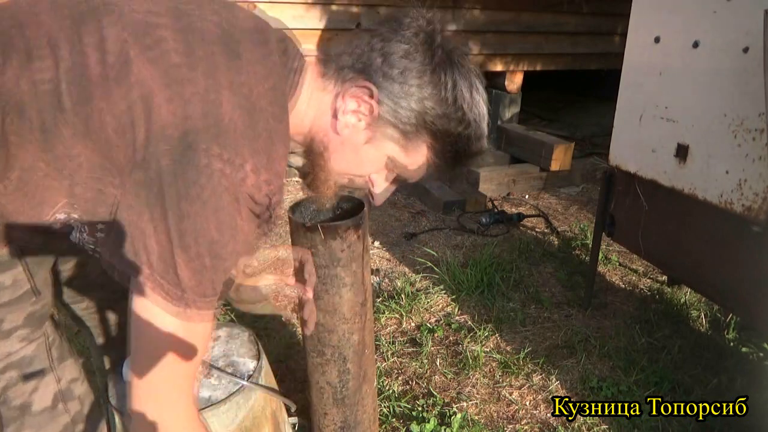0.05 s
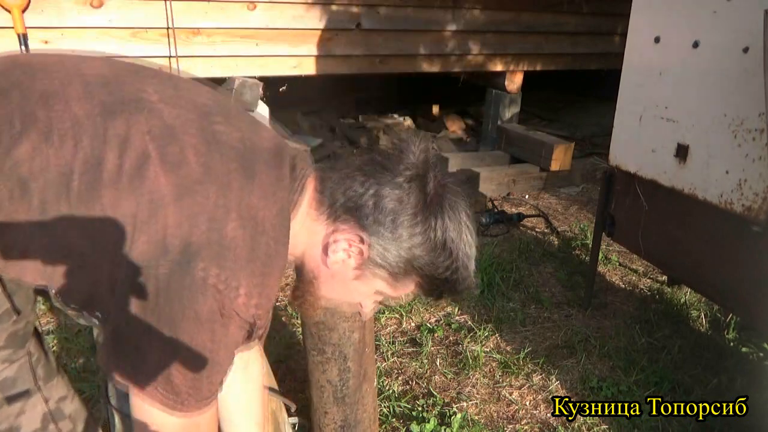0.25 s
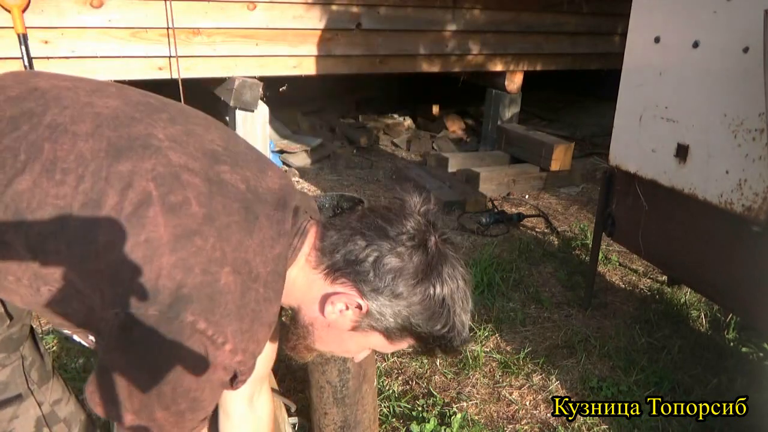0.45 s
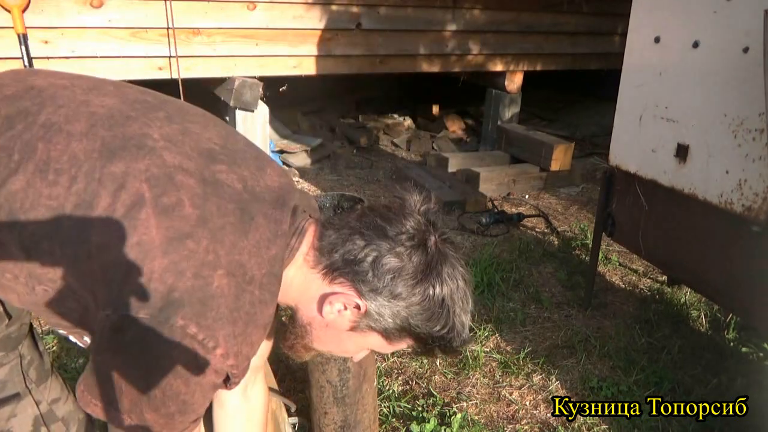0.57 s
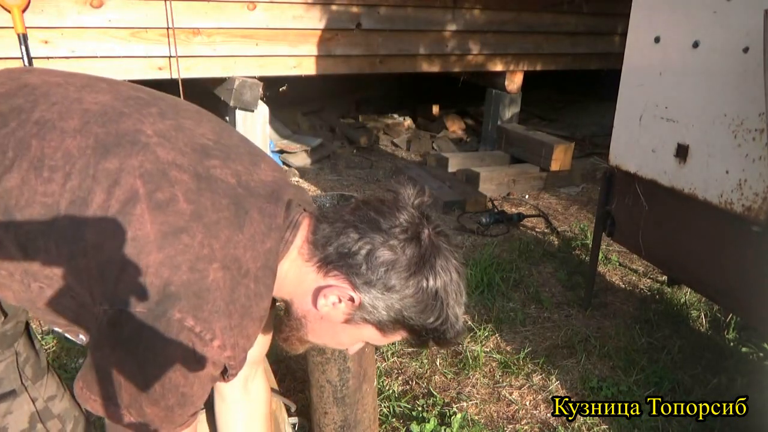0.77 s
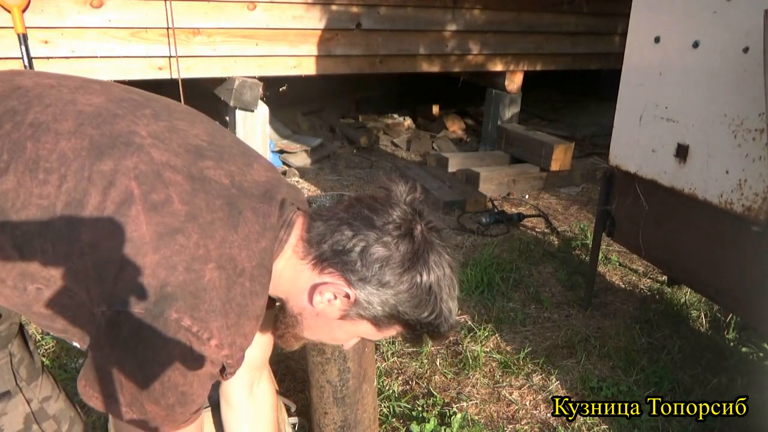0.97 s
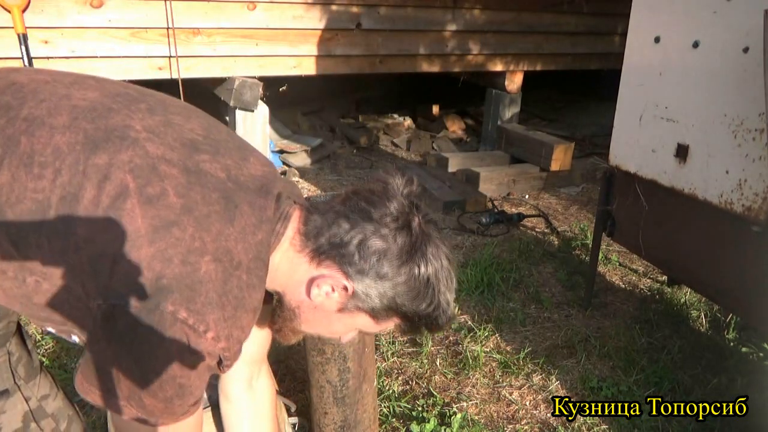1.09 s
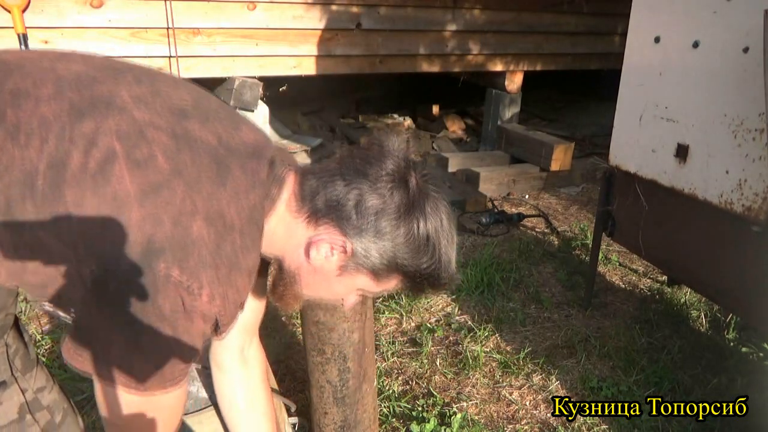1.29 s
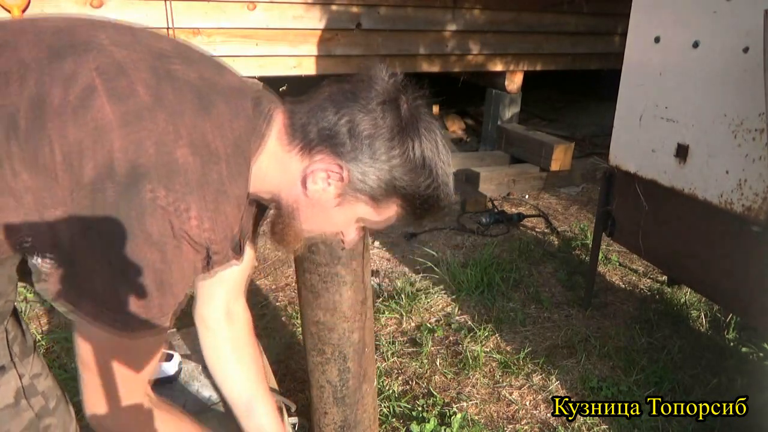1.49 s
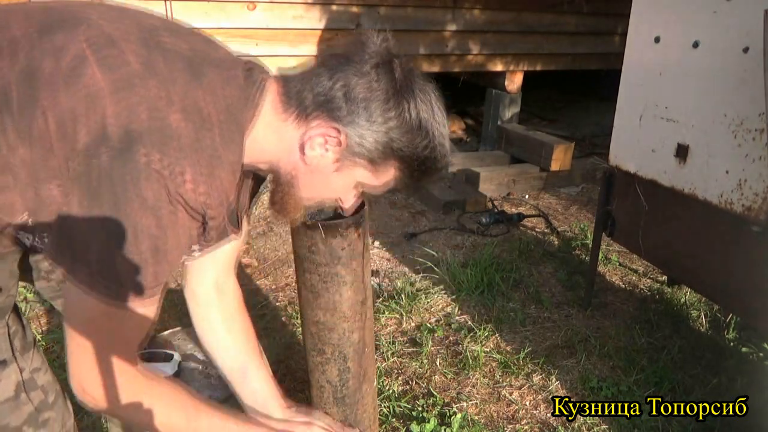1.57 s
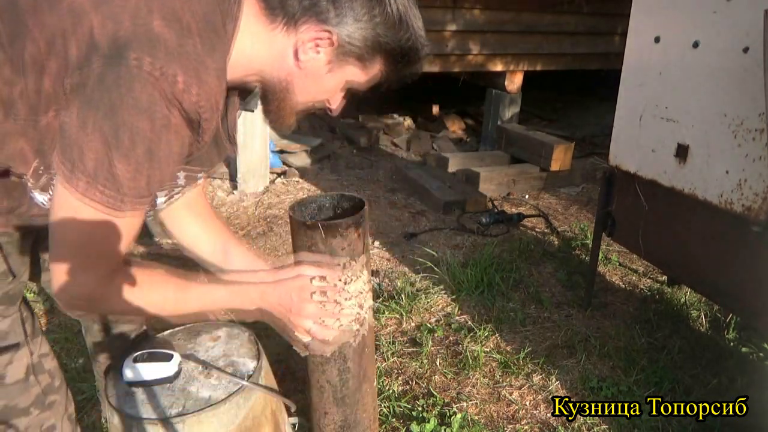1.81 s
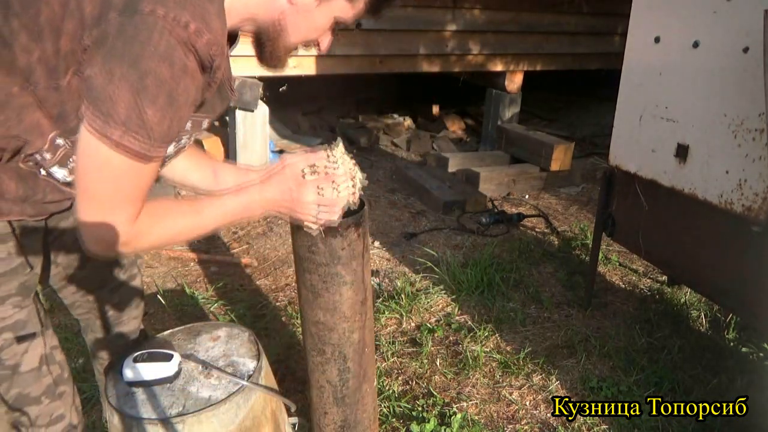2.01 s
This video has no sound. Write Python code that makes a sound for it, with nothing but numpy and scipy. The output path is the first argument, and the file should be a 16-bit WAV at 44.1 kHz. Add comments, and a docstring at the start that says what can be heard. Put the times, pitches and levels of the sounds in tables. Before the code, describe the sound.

Dry wood chips are scooped by hand from a bin in an open yard: crackling, rustling surges with dull hollow knocks, fading to a few light ticks over faint outdoor hush, heard fairly close.

```python
"""An outdoor yard with a bin of dry wood chips: two hands dig in and scoop up a handful.
Surges of small ringing grains rustle, clatter and crackle; lumps in the bin knock as decaying sines.
Stray chips tick as band-passed rattles and go on ticking once the digging has faded.
A few dull echoes and a quiet hush of shaped noise lie behind."""
import sys
import numpy as np
from scipy import signal
from scipy.fft import rfft, irfft, next_fast_len
from scipy.io import wavfile

SR = 44100
rng = np.random.default_rng(int(sys.argv[2]) if len(sys.argv) > 2 else 0)


def undo_db(level):
    """Turn decibels back into plain size, where 20 dB means ten times bigger."""
    steps = np.asarray(level, float) / 20
    return 10 ** steps


def dump(signal):
    """Clip the signal to [-1, 1] and save it as 16-bit WAV at the path in sys.argv[1]."""
    limited = np.clip(np.atleast_2d(signal).T, -1, 1)
    pcm = np.round(limited * 32767).astype(np.int16)
    wavfile.write(sys.argv[1], SR, pcm)


N = 90404

# Yard spectrum. Each row: frequency in Hz, relative density in dB.
YARD_SPECTRUM = [(18, -51), (30, -40), (115, -17.5), (760, -12), (937, -2), (1040, -20), (1130, -6.5),
                 (1320, -13), (2120, -13), (8980, -17.5), (16000, -29)]
# Reflections off ground and walls. Each row: delay in seconds, level in dB.
ECHOES = [(.0061, -18.5), (0.0123, -13.5), (.019, -23.5), (.031, -36.5)]
# Stray chips ticking. Each row: start in seconds, treble, middle and body level in dB,
# rattle length in seconds.
TICKS = [(0.1707, -36, -50, -67, 0.0017), (0.1747, -40, -54, -58, 0.0045), (0.4114, -27, -32, -38, 0.002),
         (0.4243, -30, -38, -44, 0.0008), (0.4737, -22, -23, -36, 0.0017), (0.5219, -21, -29, -30, 0.0014),
         (0.5371, -24, -23, -32, 0.0059), (0.89, -34, -33, -53, 0.0048), (1.3552, -30, -53, -54, 0.0004),
         (1.3832, -44, -54, -62, 0.0086), (1.4158, -29, -49, -61, 0.0019), (1.4231, -44, -44, -63, 0.0086),
         (1.4724, -39, -54, -62, 0.0008), (1.4981, -34, -37, -59, 0.0018), (1.5096, -32, -29, -45, 0.0009),
         (1.518, -37, -40, -56, 0.0016), (1.5359, -39, -49, -60, 0.0019), (1.5522, -28, -35, -53, 0.0005),
         (1.5537, -31, -35, -51, 0.0005), (1.5608, -30, -45, -56, 0.0008), (1.5728, -39, -55, -62, 0.0014),
         (1.5877, -45, -59, -65, 0.0011), (1.6156, -45, -52, -60, 0.0037), (1.6181, -43, -45, -52, 0.0047),
         (1.6355, -40, -53, -65, 0.0022), (1.6498, -52, -51, -59, 0.0086), (1.6812, -40, -52, -59, 0.004),
         (1.7007, -47, -54, -66, 0.004), (1.7201, -38, -52, -62, 0.0024), (1.7214, -41, -42, -52, 0.0037),
         (1.7635, -42, -54, -64, 0.0028), (1.7776, -44, -49, -61, 0.0049), (1.8149, -41, -53, -67, 0.0019),
         (1.8399, -42, -56, -66, 0.0015), (1.8456, -37, -43, -55, 0.0046), (1.875, -42, -45, -66, 0.0046),
         (1.91, -44, -57, -68, 0.0039), (1.9698, -42, -60, -65, 0.0003), (1.9849, -42, -60, -70, 0.0011),
         (2.017, -59, -60, -61, 0.0086)]
# Treble, middle and body of a tick. Each row: lower and upper edge in Hz.
TICK_BANDS_HZ = [(6800, 10800), (1800, 5500), (400, 1500)]
# Lumps knocking in the bin. Each row: start in seconds, level in dB, reference pitch in Hz,
# 60 dB decay in seconds (before limits), overtone tilt in dB per octave away from the pitch.
KNOCKS = [(.223, -37, 191.6, 0.061, -5.5), (.2255, -40, 297, 0.032, -5.5), (0.276, -37.5, 710, 0.021, -7),
          (.315, -47, 842, .015, -4), (.3413, -33, 770, 0.018, -5), (0.3594, -25, 840, 0.019, -5),
          (.361, -31.5, 231, 0.055, -15), (0.378, -22, 900, 0.022, -5), (.4034, -23.5, 850, 0.025, -11.5),
          (.5376, -27.5, 886, 0.025, -7), (.650, -27.5, 640, 0.024, -7.5), (0.7188, -25.5, 817, .015, -4),
          (0.7741, -21, 822, 0.029, -13), (0.7777, -26, 830, 0.011, -12), (0.843, -24.5, 537, 0.017, -16),
          (0.99, -25, 502, 0.018, -7), (1.0346, -34.5, 720, .015, -6), (1.0506, -22, 595, 0.011, -6.5),
          (1.2188, -24, 976, 0.014, -7), (1.2215, -33, 1220, .015, -3.5), (1.248, -30.5, 718, 0.016, -5.5),
          (1.3112, -33.5, 764, 0.017, -2), (1.3115, -36, 2570, 0.0077, -7), (1.351, -37.5, 600, .015, -12),
          (1.390, -57.5, 700, .015, 1), (1.621, -46, 880, .015, 2), (1.8474, -47, 592, 0.032, -11)]
# Uneven overtones of a lump. Each entry: ratio to the reference pitch.
KNOCK_RATIOS = [0.847, 1.043, 1.26, 1.64, 2.11, 3, 3.24]
# Surges of the hands. Each row: time in seconds, fine rustle, hollow clatter and
# chip-on-chip crackle level in dB.
DIGGING = [(0.213, -70, -76.5, -61.5), (0.225, -44, -55, -54), (0.245, -42.5, -55.5, -53.5),
           (0.305, -45.5, -54, -54.5), (0.334, -48, -48, -50.5), (0.362, -35, -32.5, -42),
           (0.397, -39, -37, -38.5), (0.412, -47.5, -43.6, -50), (0.43, -46.5, -49, -46),
           (0.456, -42.0, -52, -40), (0.483, -35.8, -36, -34.5), (0.508, -34, -34.5, -31.5),
           (0.549, -40.5, -46.5, -40.0), (0.6, -40.5, -42.5, -42.5), (0.649, -38.9, -41, -42),
           (0.7, -43.5, -43.5, -41.5), (0.73, -39, -43.5, -43), (0.75, -47.5, -45.5, -51.5),
           (0.779, -39, -37.3, -43), (0.811, -40.5, -41.0, -43.5), (0.865, -39, -54.5, -44),
           (0.909, -48, -51.5, -60.5), (0.961, -47.4, -51, -48.5), (1.0, -44, -42, -47),
           (1.046, -40, -38.5, -42.1), (1.083, -34, -37.5, -38.5), (1.116, -39, -40.5, -43.5),
           (1.16, -42, -46, -48), (1.21, -48, -54.5, -57), (1.27, -52.1, -58, -56),
           (1.34, -54.5, -59.5, -63), (1.4, -60, -61, -62), (1.435, -51.5, -60.4, -59.5),
           (1.48, -63, -67.0, -67), (1.54, -53, -62, -63), (1.6, -66, -67, -63), (1.75, -66.5, -68, -69),
           (1.9, -64.5, -70.5, -68.5), (2.04, -87, -79, -85)]
# Grain layers. Each holds: grains per second at the loudest, spread of grain sizes in dB,
# ring in cycles per 60 dB, clumping in dB.
RUSTLE = (20000, 1.14, 6.7, 1.8)
CLATTER = (3500, 2.83, 9.25, 2.4)
CRACKLE = (8000, 1.67, 4.14, 2.0)
# Grain colours. Each row: frequency in Hz, relative level in dB.
RUSTLE_COLOUR = [(2650, -4), (4500, -15.5), (4900, -21.5), (6880, -6), (7860, -1), (9260, -2), (14000, -20),
                 (16000, -27)]
CLATTER_COLOUR = [(71, -59), (120, -50), (187, -7), (226, 0), (372, -10), (439, 5.5), (708, 1), (827, 10),
                  (966, -4), (1700, -2.5), (2210, -24), (3740, -120)]
CRACKLE_COLOUR = [(820, -18.5), (1400, -5), (1640, -6), (2360, -19.5), (2950, -2.5), (3620, -11.5),
                  (5500, -13), (7150, -43), (12100, -120)]

YARD_DB, YARD_PATCHY_DB, YARD_CORRELATION = -62.5, 0.7, 0.41
ECHO_CUT_HZ, ECHO_RIGHT_LATER = 2200, 0.007   # fraction of the delay
RATTLE_PER_S, RATTLE_DB, SHARP_S = 9000, -9, 0.002
AFTER_S, AFTER_DB = 0.013, -16   # fainter touches trail each tick
SETTLE_PER_S, SETTLE_S, SETTLE_DB = 800, 0.002, -7.5
KNOCK_MAX_CYCLES, RATIO_SPREAD = 19, 0.05
THINNING = 0.2   # dB of grain rate per dB of level
PAN_SPREAD = 0.14
LOW_CUT_HZ, LEFT_UP_DB = 216, 0.34   # right goes down as much
LEFT_RIGHT = np.array([[1], [-1]])


def at_hz(points, hz):
    """Reads a spectrum on a log-frequency axis."""
    points_hz, points_db = np.transpose(points)
    return np.interp(np.log(hz), np.log(points_hz), points_db)


def rms_one(x):
    """Scales to rms 1."""
    return x / np.sqrt(np.mean(x ** 2) + 1e-20)


def drift(rate_hz):
    """Slow random wander of rms 1: noise through a double-pole low-pass."""
    r = np.exp(-2 * np.pi * rate_hz / SR)
    noise = rng.standard_normal(N + SR)
    return rms_one(signal.lfilter([1], [1, -2 * r, r * r], noise)[SR:])


def ring(clicks, hz, t60_s):
    """Two-pole resonator: a unit click starts a decaying sine of height 1."""
    r, w = undo_db(-60 / (t60_s * SR)), 2 * np.pi * hz / SR
    return signal.lfilter([0, np.sin(w)], [1, -2 * r * np.cos(w), r * r], clicks + 1e-18)


def placed(x, where):
    """Pans by level difference; positive is left."""
    return x * (1 + LEFT_RIGHT * PAN_SPREAD * where)


def yard():
    """Broad outdoor hush: shaped noise, partly alike in both channels, slightly patchy in level."""
    size = next_fast_len(N)
    hz = np.maximum(np.arange(size // 2 + 1) * SR / size, 1)
    spectrum = rfft(rng.standard_normal((2, size))) * undo_db(at_hz(YARD_SPECTRUM, hz))
    mid, side = irfft(spectrum, size)[:, :N]
    hush = np.sqrt(1 + YARD_CORRELATION) * mid + np.sqrt(1 - YARD_CORRELATION) * side * LEFT_RIGHT
    return undo_db(YARD_DB + YARD_PATCHY_DB * drift(6)) * rms_one(hush)


def echoes(x):
    """A few dull reflections off ground and walls, a little later at the right."""
    dull = signal.lfilter(*signal.butter(1, ECHO_CUT_HZ, fs=SR), x)
    out = np.zeros((2, N))
    for delay_s, db in ECHOES:
        for side in range(2):
            lag = int(delay_s * SR * (1 + ECHO_RIGHT_LATER * side))
            out[side, lag:] += undo_db(db) * dull[side, :N - lag]
    return out


def ticks():
    """A first touch and a dying rattle of smaller ones excite three bands."""
    t = np.arange(SR // 20) / SR
    trains = np.zeros((3, 2, N + SR))
    for start_s, *levels_db, length_s in TICKS:
        heights = undo_db(RATTLE_DB) * rng.standard_normal((3, len(t)))
        touches = heights * (rng.random(len(t)) < RATTLE_PER_S / SR)
        touches[:, 0] = min(1, SHARP_S / length_s)   # long rattles start softly
        decay = np.exp(-(t / length_s) ** 2) + undo_db(AFTER_DB) * np.exp(-t / AFTER_S)
        i, where = int(start_s * SR), rng.standard_normal()
        for k, db in enumerate(levels_db):
            trains[k, :, i:i + len(t)] += placed(undo_db(db) * touches[k] * decay, where)
    out = 0
    for train, edges_hz in zip(trains, TICK_BANDS_HZ):
        sos = signal.butter(2, edges_hz, "band", fs=SR, output="sos")
        click_peak = np.abs(signal.sosfilt(sos, np.eye(1, 200)[0])).max()
        out = out + signal.sosfilt(sos, train[:, :N] + 1e-18) / click_peak
    return out


def knocks():
    """Each lump rings briefly at uneven overtones of its pitch and settles in a few more touches."""
    out, t = np.zeros(N + SR), np.arange(SR // 10) / SR
    chance = rng.standard_normal((len(KNOCKS), 2, len(KNOCK_RATIOS)))
    for (start_s, db, hz, t60_s, tilt_db), (luck, detune) in zip(KNOCKS, chance):
        heights = undo_db(SETTLE_DB) * rng.standard_normal(len(t)) * np.exp(-t / SETTLE_S)
        touches = heights * (rng.random(len(t)) < SETTLE_PER_S / SR)
        touches[0] = 1
        longest_s = KNOCK_MAX_CYCLES / hz
        t60_s = np.clip(t60_s, 0.6 * longest_s, longest_s)
        i = int(start_s * SR)
        for k, ratio in enumerate(KNOCK_RATIOS):
            level_db = db + tilt_db * abs(np.log2(ratio)) - 4.5 + 2.2 * luck[k]
            overtone_hz = hz * ratio * (1 + RATIO_SPREAD * detune[k])
            rung = ring(touches, overtone_hz, t60_s / ratio ** 0.5)
            out[i:i + len(t)] += undo_db(level_db) * (-1) ** k * rung   # alternating sign
    return placed(out[:N], 0)


def grains(kind, colour, level_db, count):
    """Clumped random contacts of uneven size, each ringing briefly at one of count pitches."""
    rate_per_s, spread_db, cycles, clump_db = kind
    clumps = undo_db(clump_db * (drift(25) + drift(120)))
    busy = undo_db(np.maximum(THINNING * (level_db - level_db.max()), -24))
    sizes = undo_db(spread_db * np.minimum(rng.exponential(1, N), 5)) * rng.choice([-1, 1], N)
    sizes = sizes * busy ** -0.5   # sparser grains are larger: power holds
    hit = rng.random(N) < rate_per_s * busy * clumps / SR
    clicks = placed(sizes * hit, rng.standard_normal(N))
    dealt, out = rng.integers(0, count, N), 0
    pitches_hz = np.geomspace(colour[0][0], colour[-1][0], count + 2)[1:-1]
    for k, hz in enumerate(pitches_hz):
        t60_s = cycles / hz
        rung = ring(ring(clicks * (dealt == k), hz, t60_s), hz, t60_s)   # twice: soft onset
        out = out + undo_db(at_hz(colour, hz)) * np.sqrt(hz) * rms_one(rung)   # sqrt: band width
    return undo_db(level_db) * rms_one(out)


def digging():
    """Rustle, clatter and crackle grains follow the surges of the hands."""
    time_s, *columns_db = np.transpose(DIGGING)
    t = np.arange(N) / SR
    fine_db, hollow_db, crisp_db = [np.interp(t, time_s, c, left=-120) for c in columns_db]
    rustle = grains(RUSTLE, RUSTLE_COLOUR, fine_db, count=16)
    clatter = grains(CLATTER, CLATTER_COLOUR, hollow_db, count=24)
    crackle = grains(CRACKLE, CRACKLE_COLOUR, crisp_db, count=12)
    return rustle + clatter + crackle


def scene():
    """Chips, their echoes and the yard; small chips radiate little bass, so they are high-passed."""
    low_cut = signal.butter(3, LOW_CUT_HZ, "high", fs=SR, output="sos")
    chips = signal.sosfilt(low_cut, digging() + knocks() + ticks())
    mix = chips + echoes(chips) + yard()
    return mix * undo_db(LEFT_UP_DB * LEFT_RIGHT)


def roll_off(x):
    """The treble ends steeply here."""
    return signal.sosfilt(signal.butter(12, 16480, fs=SR, output="sos"), x)


def record(dry):
    """Takes the finished mix to its output form."""
    return roll_off(dry)


dry = scene()
out = record(dry)
dump(out)
```